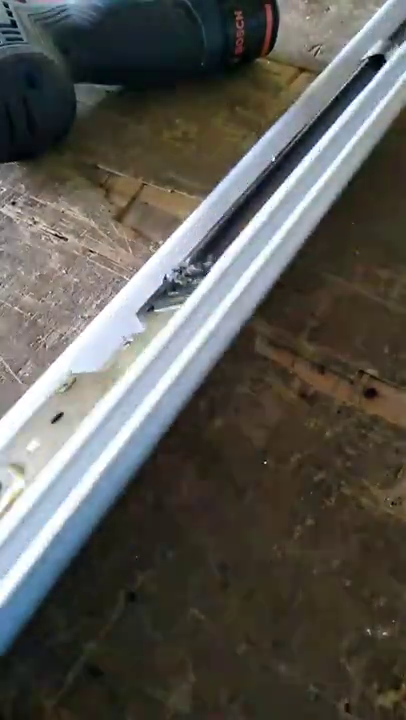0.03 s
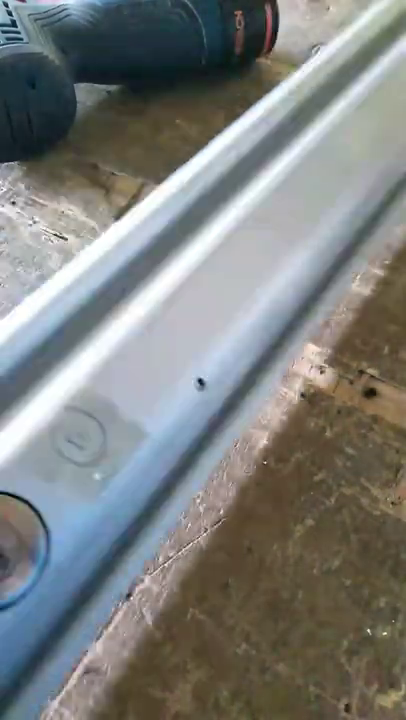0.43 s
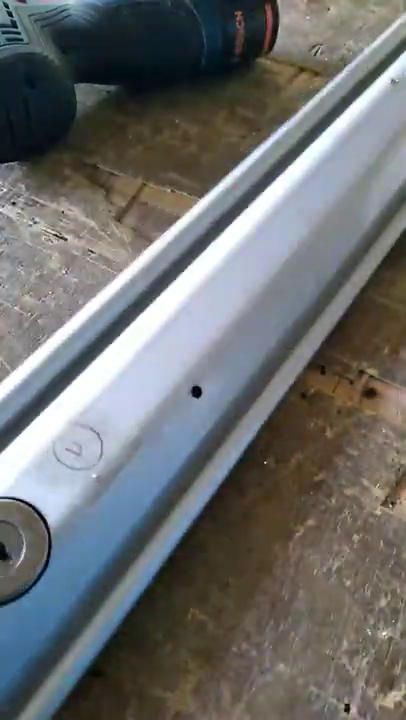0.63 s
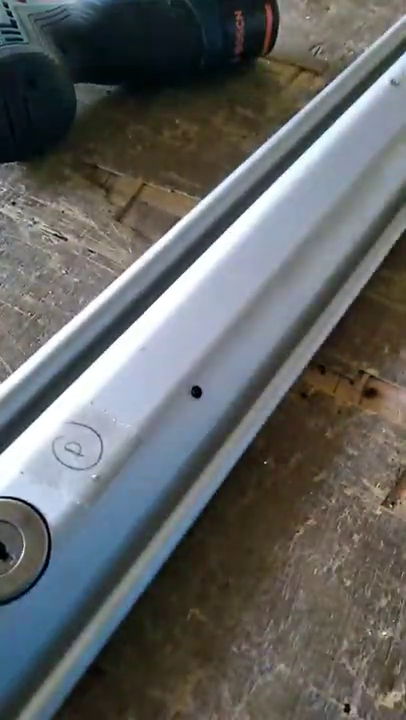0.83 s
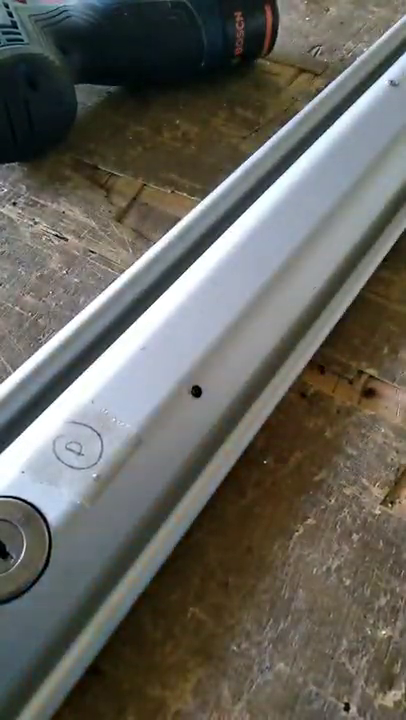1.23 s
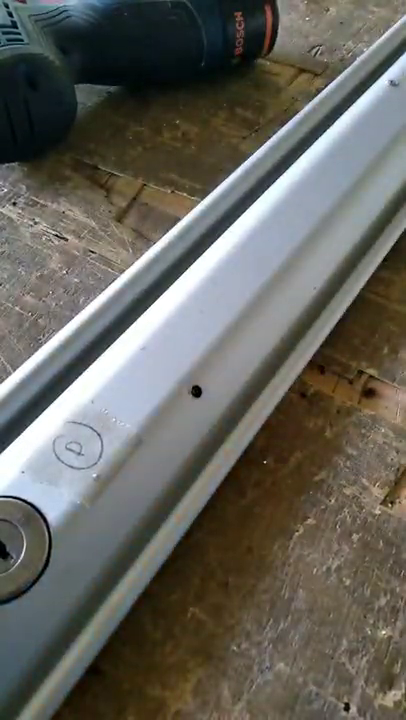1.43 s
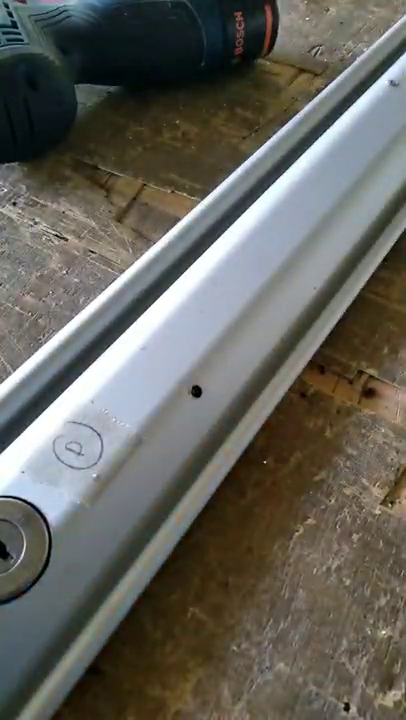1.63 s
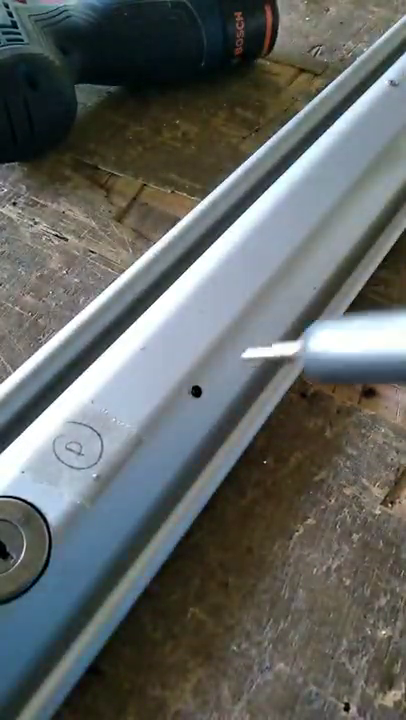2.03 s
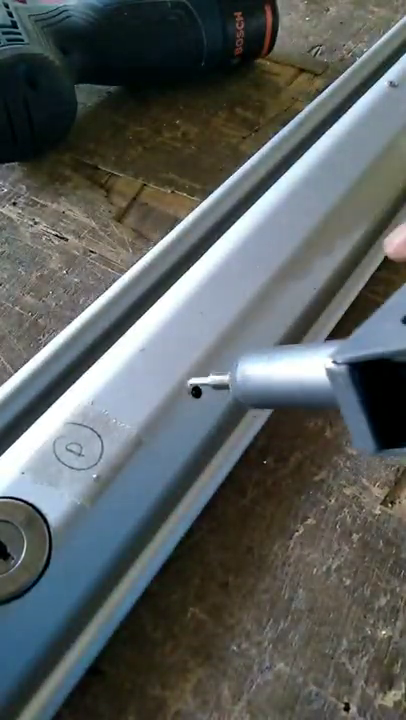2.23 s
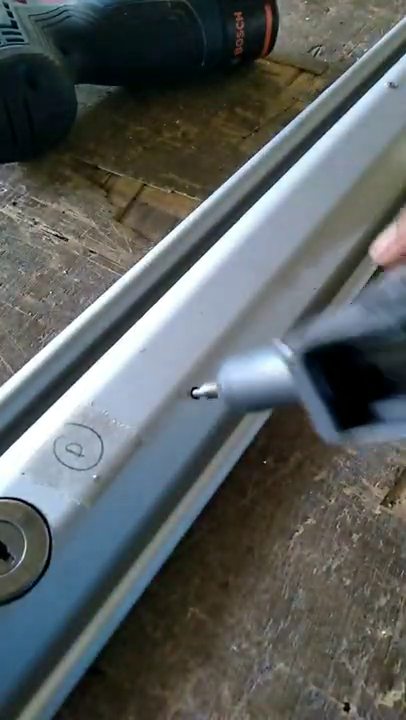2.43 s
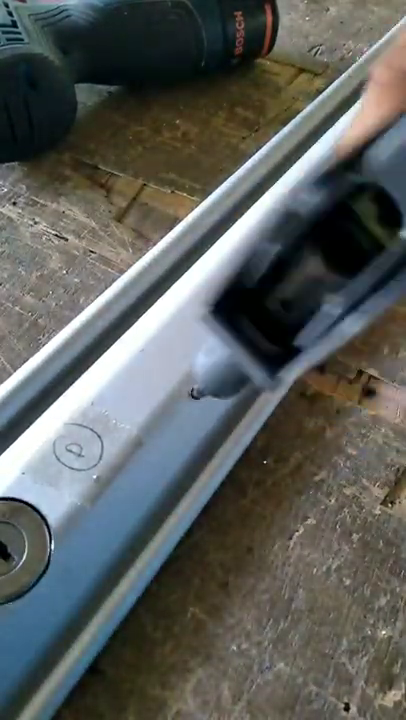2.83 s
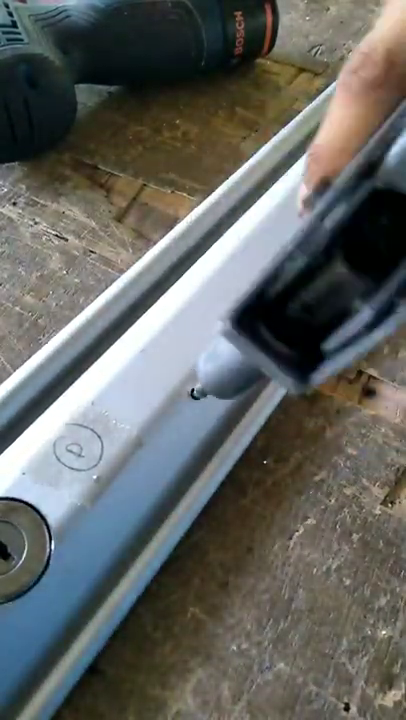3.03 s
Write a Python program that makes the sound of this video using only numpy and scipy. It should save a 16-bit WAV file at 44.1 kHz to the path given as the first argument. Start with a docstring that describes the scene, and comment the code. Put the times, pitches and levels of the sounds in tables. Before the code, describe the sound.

A hollow aluminium slat scrapes, clatters onto a wooden floor and rocks to rest. After a few faint ticks, a hand riveter knocks against it several times, over low outdoor air and a soft hiss.

```python
"""A hollow aluminium slat slides in the hand, is flipped, clatters onto a wooden floor and rocks to rest.
Each impact excites damped modes of its hollow body and thin walls; sliding friction adds gritty noise.
A hand riveter is picked up, its loose parts ping, and its tip knocks at a drilled hole in the slat.
A short reverberation follows these sounds. Behind them lie low outdoor air, a soft hiss and a faint,
high pulsing trill like an insect's."""
import sys
import numpy as np
from scipy import signal
from scipy.fft import rfft, irfft
from scipy.io import wavfile
from scipy.ndimage import uniform_filter1d

SR = 44100
rng = np.random.default_rng(int(sys.argv[2]) if len(sys.argv) > 2 else 0)


def transcribe(u):
    """Save the signal u as a 16-bit wav file named by the first command-line argument.

    u: samples, shape (n,) or (channels, n), limited to [-1, 1]; the rate is SR.
    q: integer samples, one column per channel.
    """
    v = np.clip(np.atleast_2d(u).T, -1, 1)
    q = np.round(v * 32767).astype(np.int16)
    wavfile.write(sys.argv[1], SR, q)


N = 141120

# Modes of the slat's thin walls. Each row: frequency in Hz, relative level in dB, T60 in seconds.
WALL_MODES = [(1120, -10, 0.06), (1316, -3.5, 0.026), (1458, -6.5, .05), (1740, -8, 0.031),
              (1919, -2, 0.059), (2152, 4, 0.025), (2680, -5, 0.052)]
RING_S, LEVEL_WINDOW_S = 0.3, 0.01
BODY_T60_S = 0.078  # T60 is the time taken to decay by 60 dB


def slat_clatter():
    """Impact excitation: each landing sounds the hollow body and thin walls; a hard edge adds a crack."""
    # Landings. Each row: start in seconds, then body, wall and edge levels in dB.
    landings = [(0.06, -45, -66, -89), (.098, -45, -76, -71), (0.1933, -40.5, -53.5, -70),
                (.224, -35.5, -57, -65), (.236, -73, -50.5, -74), (.325, -67, -46.5, -65),
                (0.347, -38, -66, -69), (0.3564, -28.5, -33.5, -34), (0.3764, -27.5, -35, -36.5),
                (0.39, -36, -45, -73), (.406, -39.5, -44.5, -53), (.415, -27.5, -45.5, -48),
                (0.4207, -40.5, -38, -47), (.433, -48, -35.5, -44.5), (.443, -38, -43.5, -52.5),
                (.466, -36, -51, -60.5), (.530, -42.5, -46, -58), (.538, -46.5, -51, -60.5)]
    # Spectra of the dense wall and edge modes. Each row: frequency in Hz, relative density in dB.
    wall_spectrum = [(600, 7), (1000, -11), (1500, 5.5), (1800, -1), (2120, 15.5), (2400, 2.5), (2700, 4),
                     (2870, -35), (3300, -30), (5000, -42)]
    edge_spectrum = [(2000, -19), (2850, -1.5), (3200, 10), (3650, -4.5), (4150, -0.5), (5200, -12.5),
                     (6200, -8.5), (7000, -19), (7750, -4.5), (8700, -10), (9700, -23), (13000, -15.5),
                     (16000, -19)]
    # Modes of the hard edge. Each row: frequency in Hz, relative level in dB, T60 in seconds.
    edge_modes = [(3296, 2, 0.023), (3960, 4, 0.016)]
    wall_rise_s, edge_rise_s = 0.0013, 0.0028
    out = np.zeros(N)
    for at, body_db, wall_db, edge_db in landings:
        walls = dense_modes(wall_spectrum, wall_rise_s, t60_s=0.04)
        walls += undb(-12) * ring(WALL_MODES, wall_rise_s)
        edge = dense_modes(edge_spectrum, edge_rise_s, t60_s=0.032)
        edge += undb(-6.5) * ring(edge_modes, edge_rise_s)
        add(out, at, undb(body_db) * hollow_body() + undb(wall_db) * walls + undb(edge_db) * edge)
    return out


def hollow_body():
    """Resonance: a few low modes among many weaker ones give the hollow profile its boxy note."""
    # Distinct modes. Each row: frequency in Hz, relative level in dB, T60 in seconds.
    modes = [(510, -46, 0.18), (653, -6, 0.14), (626, 2.5, 0.15), (788, 0.5, 0.014)]
    # Spectrum of the dense modes. Each row: frequency in Hz, relative density in dB.
    spectrum = [(200, -12.5), (380, -9.5), (520, 3.5), (640, 3.5), (800, -5), (1000, -20), (1600, -34)]
    rise_s = 0.0012
    note = undb(-6) * ring(modes, rise_s)
    return unit_energy(note + undb(-5) * dense_modes(spectrum, rise_s, BODY_T60_S))


def slat_rocking():
    """Contact damping: the floor shortens the settling slat's ring to dry clacks with a brief clink."""
    # Contacts. Each row: start in seconds, body level in dB, wall level in dB, wall pitch as a ratio.
    contacts = [(.588, -50, -45, 1.05), (0.6681, -28.5, -42.5, 0.81), (.772, -76, -41.5, 1.04),
                (.785, -48.5, -61, 1.7), (.834, -55, -41, 1.08), (.908, -55, -58.5, .9),
                (1.017, -58.5, -53.5, 0.97)]
    # Spectra of the walls and body. Each row: frequency in Hz, relative density in dB.
    wall_spectrum = [(500, 1.5), (1000, -4.5), (1500, -7.5), (1850, 2.5), (2120, 4.5), (2750, -10),
                     (4300, -26), (5200, -40)]
    body_spectrum = [(120, 10), (600, 1), (1000, 2), (1900, -15), (3000, -26)]
    rise_s, note_hz, clink_hz = 0.0022, 605, 2083
    t = np.arange(int(RING_S * SR)) / SR
    note = unit_energy(envelope(rise_s=0.006, t60_s=0.013) * np.sin(2 * np.pi * note_hz * t))
    out = np.zeros(N)
    for at, body_db, wall_db, pitch in contacts:
        body = note + undb(-10.5) * dense_modes(body_spectrum, rise_s, BODY_T60_S)
        walls = dense_modes([(hz * pitch, db) for hz, db in wall_spectrum], rise_s, t60_s=0.038)
        clink = undb(-3.5) * ring([(clink_hz * pitch, 0, 0.0098)], rise_s)
        add(out, at, undb(body_db) * body + undb(wall_db) * (walls + clink))
    return out


def slat_scrape():
    """Stick-slip friction: the slat slides over hand and floor in tiny slips of uneven size."""
    # Course of the scrape. Each row: time in seconds, level in dB.
    levels = [(0, -73), (.11, -66), (.17, -54.5), (.23, -49.5), (.29, -56.5), (.345, -48.5), (.40, -42),
              (.445, -45), (.49, -53.5), (.57, -61.5), (1.1, -75), (1.2, -87)]
    # Friction spectrum. Each row: frequency in Hz, relative density in dB.
    spectrum = [(280, -13), (480, 0), (633, -3), (1040, -23), (1900, -9), (2200, -5.5), (2710, -13),
                (2910, -25), (3400, -16), (3900, -26.5), (5290, -29), (8420, -30), (15500, -38)]
    slips_per_s, spread_db = 6000, 3
    slipping = rng.random(N) < slips_per_s / SR
    slips = slipping * rng.standard_normal(N) * undb(spread_db * rng.standard_normal(N))
    return unit_rms(colour(slips, spectrum)) * gain_curve(levels)


def riveter_knocks():
    """Impact and rebound: the steel tip strikes the slat twice; its weight thumps the boards below."""
    # Knocks. Each row: start in seconds, then thump, main note, body, ring and crack levels in dB.
    knocks = [(2.287, -56.5, -44.5, -45.5, -40, -49), (2.369, -59, -62, -56.5, -53, -64.5),
              (2.413, -61, -68, -60, -59, -72), (2.4635, -52, -35.5, -43, -48, -60.5),
              (2.685, -39, -57, -45, -35.5, -53), (2.781, -55.5, -55, -45, -56.5, -61.5),
              (2.9032, -32, -30, -33, -29.5, -38.5)]
    # Floorboard modes. Each row: frequency in Hz, relative level in dB, T60 in seconds.
    floor_modes = [(160, -10, 0.08), (199, 1, 0.081), (470, -4, 0.095), (742, 0, 0.037)]
    # Spectra of the metallic ring and crack. Each row: frequency in Hz, relative density in dB.
    ring_spectrum = [(250, -1.5), (420, 1.5), (730, 9), (950, -17.5), (1300, 0.5), (1650, -6.5),
                     (2080, 8.5), (2400, -4.5), (2750, -18), (5000, -42)]
    crack_spectrum = [(2000, -13), (2850, -5), (3200, 7.5), (3700, -3.5), (4300, -0.5), (5300, -16),
                      (6200, -10), (8300, -13.5), (10000, -23.5), (12500, -23), (15500, -10)]
    note_hz, note_t60_s = 624, 0.038
    rise_s, rebound_s, rebound_db = 0.0011, 0.0055, -6
    out = np.zeros(N)
    for at, thump_db, note_db, body_db, ring_db, crack_db in knocks:
        note = undb(note_db) * ring([(note_hz, 0, note_t60_s)], rise_s=0.005)
        thump = undb(thump_db) * ring(floor_modes, rise_s=0.0026)
        add(out, at, thump + note + undb(body_db) * hollow_body())
        for delay_s, gain in ((0, 1), (rebound_s, undb(rebound_db))):
            metal = dense_modes(ring_spectrum, rise_s, t60_s=0.042)
            metal += undb(-6) * ring(WALL_MODES, rise_s)
            add(out, at + delay_s, gain * undb(ring_db) * metal)
        add(out, at, undb(crack_db) * dense_modes(crack_spectrum, rise_s, t60_s=0.036))
    return out


def handling():
    """Light impacts: handled metal gives broadband ticks, the riveter's loose parts narrowband pings."""
    # Ticks. Each row: start in seconds, level in dB, brightness in dB.
    ticks = [(0.131, -64.5, 11), (1.310, -60.5, -3), (1.432, -63, 11), (1.514, -58.5, -4), (1.708, -66, -7)]
    # Pings. Each row: start in seconds, frequency in Hz, level in dB.
    pings = [(1.364, 6390, -58.5), (1.364, 12300, -68), (1.512, 3410, -58.5), (1.672, 2020, -50.5),
             (1.686, 10260, -65)]
    out = np.zeros(N)
    for at, db, bright_db in ticks:
        spectrum = [(1500, 16), (3400, 14.5), (5000, 5 + bright_db / 2), (15000, 2 + bright_db)]
        add(out, at, undb(db) * dense_modes(spectrum, rise_s=0.0028, t60_s=0.018))
    for at, hz, db in pings:
        peak = [(hz * 0.9, -35), (hz * 0.98, -6), (hz, 0), (hz * 1.02, -6), (hz * 1.1, -35)]
        add(out, at, undb(db) * dense_modes(peak, rise_s=0.0024, t60_s=0.06))
    return out


def rubs():
    """Sliding friction: fingers brush the metal, and the riveter's tip drags over the slat."""
    # Strokes. Each row: midpoint in seconds, length in seconds, level in dB.
    finger_strokes = [(0.043, 0.034, -61.5), (0.219, 0.064, -58.5), (0.642, 0.037, -60.5),
                      (1.482, 0.026, -59), (1.678, 0.057, -63)]
    tip_strokes = [(2.443, 0.03, -51.5)]
    # Friction spectra. Each row: frequency in Hz, relative density in dB.
    finger_spectrum = [(1200, 9.5), (2100, 18.5), (2850, 5.5), (3350, 12.5), (5200, -4), (8200, 5),
                       (11000, -4), (15300, 3)]
    tip_spectrum = [(200, -7), (650, 3.5), (1000, -10), (2100, -14), (7000, -38)]
    return friction(finger_spectrum, finger_strokes) + friction(tip_spectrum, tip_strokes)


def friction(spectrum, strokes):
    """Amplitude modulation: random level steps make noise gritty; it swells and fades with each stroke."""
    grit_db, step_samples = 2, 90
    t = np.arange(N) / SR
    noise = rng.standard_normal(N)
    steps = np.repeat(rng.standard_normal(N // step_samples + 1), step_samples)[:N]
    swells = sum(undb(db) * np.exp(-2 * ((t - at) / length) ** 2) for at, length, db in strokes)
    return unit_rms(colour(noise * undb(grit_db * steps), spectrum)) * swells


def room(x):
    """Reverberation: diffuse reflections add a short tail in two bands, the treble one weaker."""
    tail = 0
    for low_hz, high_hz, t60_s, db in ((100, 2800, 0.18, -14.5), (3500, 16000, 0.2, -20)):
        decay = envelope(rise_s=0.0099, t60_s=t60_s)
        reflections = colour(rng.standard_normal(len(decay)), [(low_hz, 0), (high_hz, 0)])
        tail += undb(db) * reflections * decay / np.linalg.norm(decay)
    return x + signal.fftconvolve(x, tail)[:N]


def outdoor_air():
    """Ambient noise: a steady low rush carries a few narrow resonances that swell and fade."""
    # Spectrum of the rush. Each row: frequency in Hz, relative density in dB.
    spectrum = [(15, -51), (25, -6.5), (75, -2.5), (119, -4.5), (183, -12.5), (523, -14), (614, -11),
                (871, -35.5), (1490, -26.5), (1660, -76), (2060, -27), (2920, -57), (9550, -53),
                (10400, -43), (11200, -48), (15500, -68)]
    # Resonances. Each row: centre in Hz, width in Hz, level in dB before the swell.
    resonances = [(633, 102, -61), (2120, 93, -75), (2704, 46, -82)]
    # Their swell. Each row: time in seconds, gain in dB.
    swell = [(0, -2.5), (1.0, 2.5), (1.4, 4), (2.2, -2.5), (2.7, -7), (3.2, -8)]
    rush = undb(-59) * unit_rms(colour(rng.standard_normal(N), spectrum))
    bands = sum(undb(db) * narrow_noise(hz, width_hz) for hz, width_hz, db in resonances)
    return rush + gain_curve(swell) * bands


def hiss():
    """Broadband noise: a soft hiss slowly swells and recedes."""
    # Spectrum of the hiss. Each row: frequency in Hz, relative density in dB.
    spectrum = [(900, -25), (1290, 4), (2150, 8.5), (2330, -3), (2660, 4.5), (2860, -5.5), (3710, -3),
                (5240, -14), (7680, -6), (10600, -16), (15500, -12)]
    # Its course. Each row: time in seconds, level in dB.
    levels = [(0, -71), (.7, -68), (1.45, -64), (1.8, -68), (2.2, -71), (3.2, -74)]
    return gain_curve(levels) * unit_rms(colour(rng.standard_normal(N), spectrum))


def trill():
    """Pulse modulation: a high, narrow noise band is gated at a regular rate, like an insect's call."""
    period_s, length_s, swell_s, louder_from_s = 0.429, 0.22, 0.063, 1.67
    since = np.arange(N) / SR - louder_from_s
    age = since % period_s
    pulses = (age < length_s) * (1 - np.exp(-age / swell_s))
    gate = uniform_filter1d(np.where(since > 0, 1, undb(-2)) * pulses, size=500)
    return undb(-81) * gate * narrow_noise(hz=10450, width_hz=440)


def ring(modes, rise_s, detune=0.003, scatter_db=1.0):
    """Modal superposition: damped sinusoids add, weighted a little differently at each contact."""
    t = np.arange(int(RING_S * SR)) / SR
    out = np.zeros(len(t))
    for hz, db, t60_s in modes:
        level_draw, pitch_draw, phase = rng.standard_normal(3)
        tone = np.sin(2 * np.pi * (hz * (1 + detune * pitch_draw) * t + phase))
        out += undb(db + scatter_db * level_draw) * envelope(rise_s, t60_s) * tone
    return unit_energy(out)


def dense_modes(spectrum, rise_s, t60_s):
    """Modal overlap: countless short modes merge into a dying burst of coloured noise."""
    decay = envelope(rise_s, t60_s)
    return unit_energy(decay * colour(rng.standard_normal(len(decay)), spectrum))


def envelope(rise_s, t60_s):
    """Damping: after a short build-up the amplitude decays exponentially."""
    t = np.arange(int(RING_S * SR)) / SR
    return (1 - np.exp(-(t / rise_s) ** 2)) * np.exp(-np.log(1000) * t / t60_s)


def narrow_noise(hz, width_hz):
    """Resonant filtering: one peak selects a narrow band from white noise."""
    f = np.fft.rfftfreq(N, 1 / SR)
    return unit_rms(irfft(rfft(rng.standard_normal(N)) / (1 + ((f - hz) / width_hz * 2) ** 2), N))


def colour(x, spectrum):
    """Spectral shaping: the gain follows (Hz, dB) points and falls 12 dB per octave beyond the ends."""
    hz, db = np.array(sorted(spectrum), float).T
    f = np.maximum(np.fft.rfftfreq(len(x), 1 / SR), 1)
    skirts = np.minimum(f / hz[0], 1) ** 2 * np.minimum(hz[-1] / f, 1) ** 2
    return irfft(rfft(x) * skirts * undb(np.interp(np.log(f), np.log(hz), db)), len(x))


def gain_curve(points):
    """Interpolation between (seconds, dB) points gives a gain over time."""
    return undb(np.interp(np.arange(N) / SR, *np.array(points).T))


def undb(db):
    """A level in decibels becomes an amplitude ratio."""
    return 10 ** (np.asarray(db) / 20)


def unit_rms(x):
    """Power normalisation sets the rms to 1."""
    return x / np.sqrt(np.mean(x ** 2) + 1e-30)


def unit_energy(x):
    """Energy normalisation gives a blow the energy of rms 1 held for LEVEL_WINDOW_S."""
    return x / np.sqrt(np.sum(x ** 2) / (LEVEL_WINDOW_S * SR))


def add(out, at_s, x):
    """Superposition: x joins the mix at a given time."""
    start = max(int(at_s * SR), 0)
    out[start:start + len(x)] += x[:max(N - start, 0)]


def scene():
    """Superposition: slat and riveter reverberate over the background, in one channel."""
    contacts = slat_clatter() + slat_rocking() + riveter_knocks() + handling() + slat_scrape() + rubs()
    return (room(contacts) + outdoor_air() + hiss() + trill())[None]


def record(dry):
    """Band limiting: a phone's steep low-pass cuts the highest treble."""
    cutoff_hz = 15700
    return signal.sosfilt(signal.ellip(10, 0.2, 70, cutoff_hz, fs=SR, output="sos"), dry)


dry = scene()
out = record(dry)
transcribe(out)
```